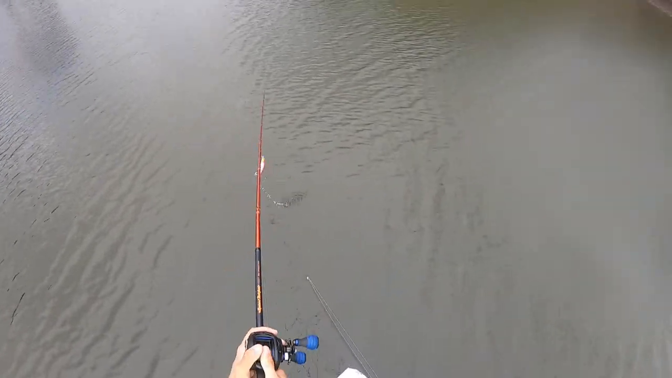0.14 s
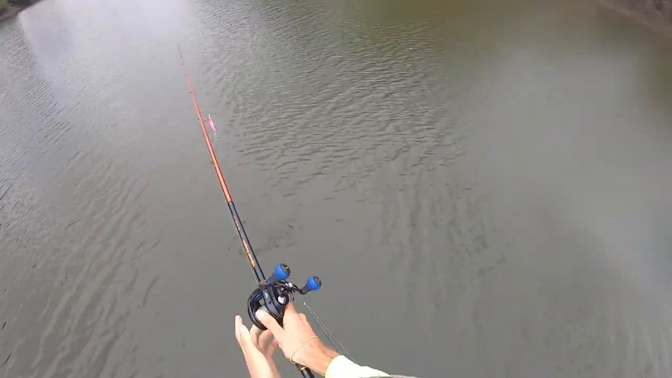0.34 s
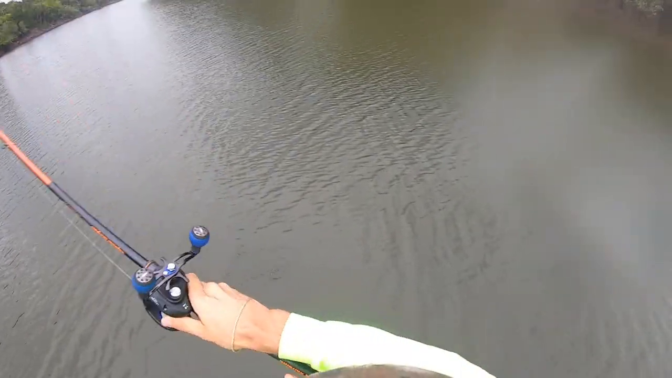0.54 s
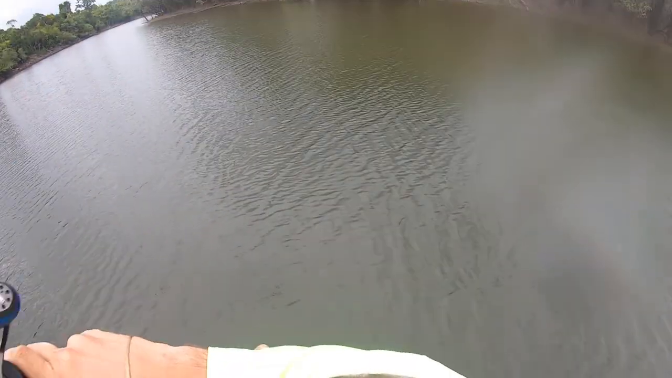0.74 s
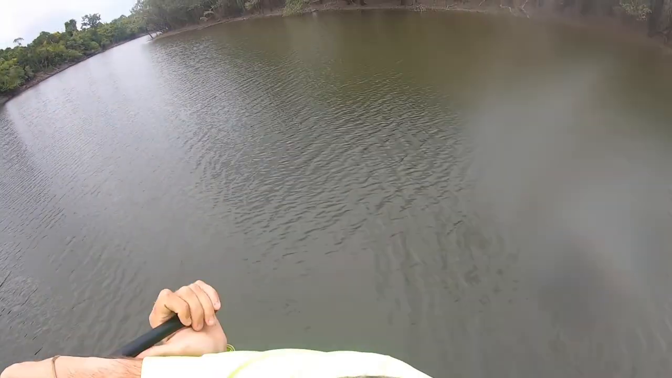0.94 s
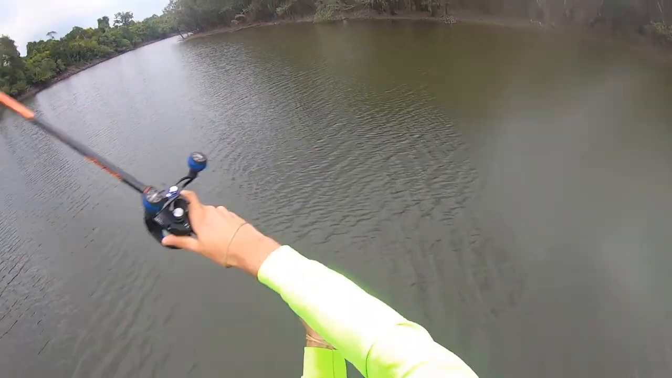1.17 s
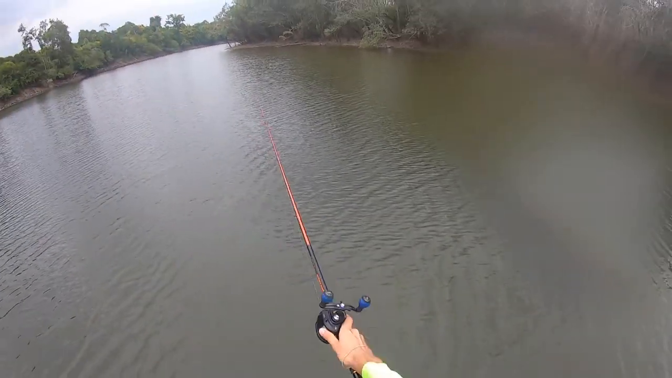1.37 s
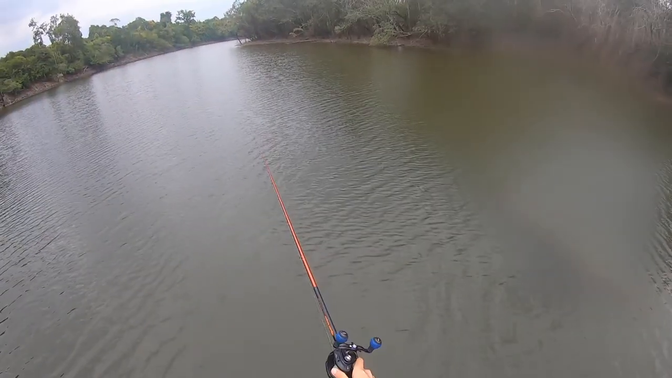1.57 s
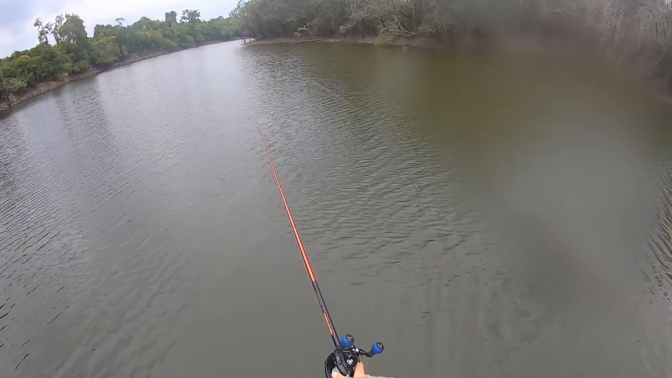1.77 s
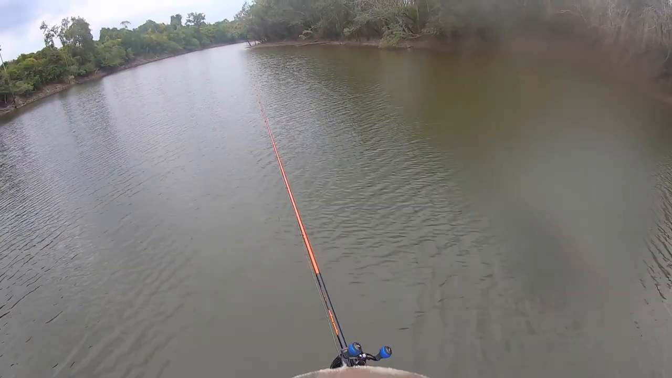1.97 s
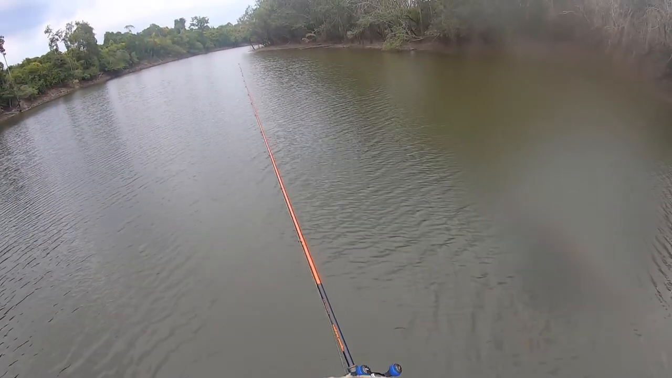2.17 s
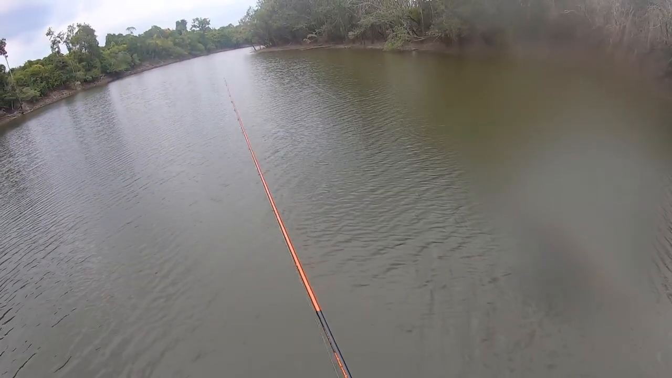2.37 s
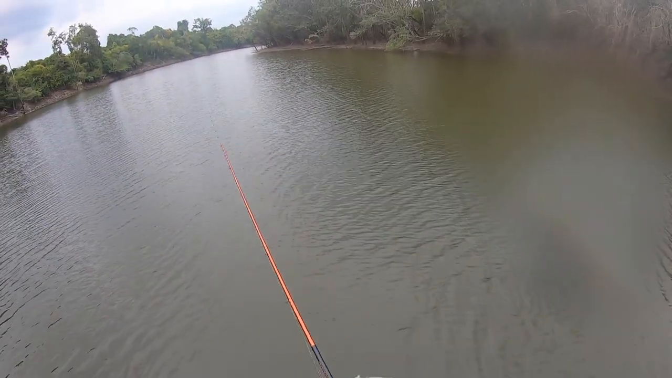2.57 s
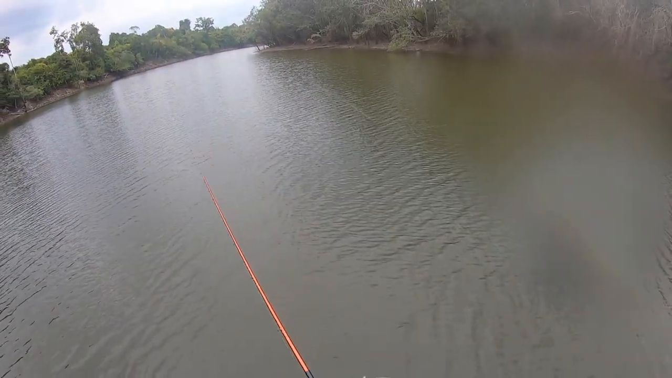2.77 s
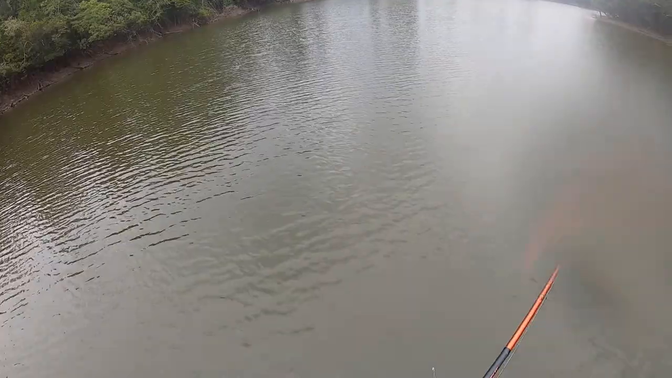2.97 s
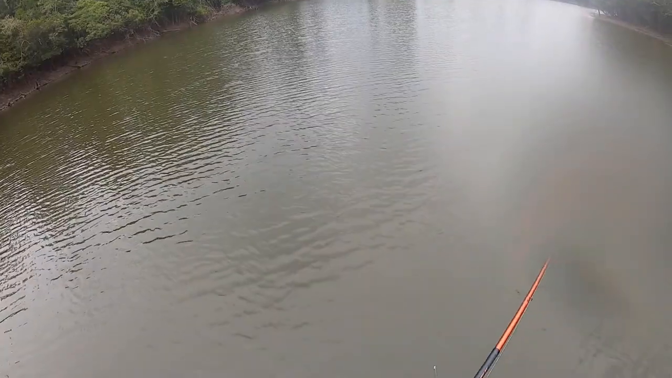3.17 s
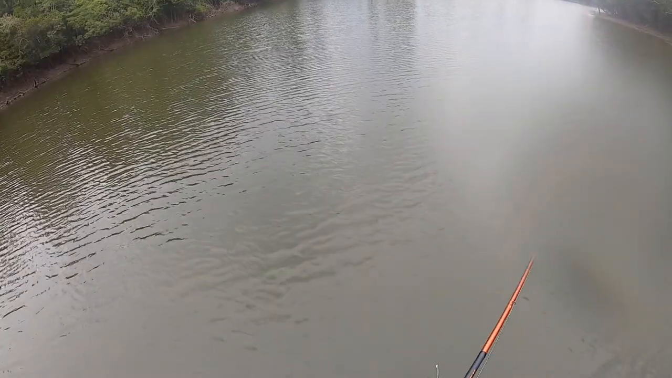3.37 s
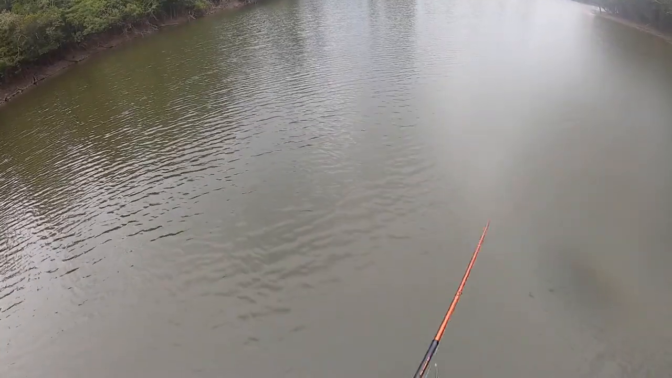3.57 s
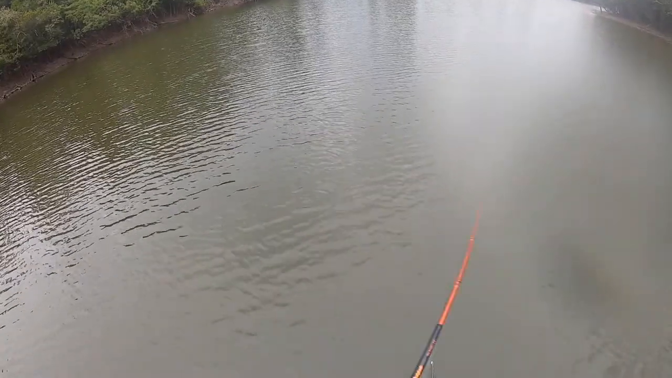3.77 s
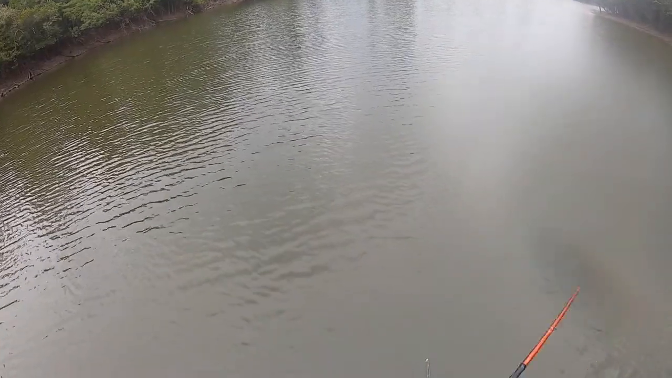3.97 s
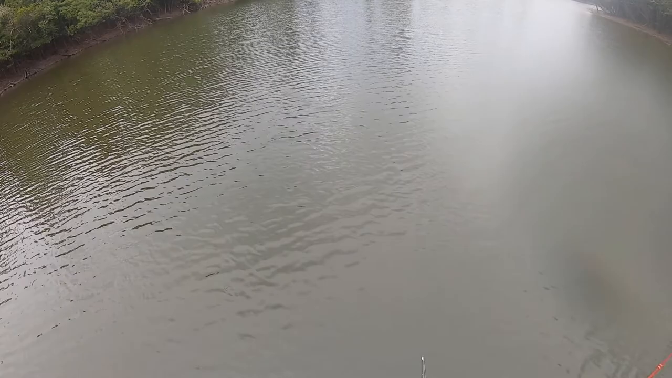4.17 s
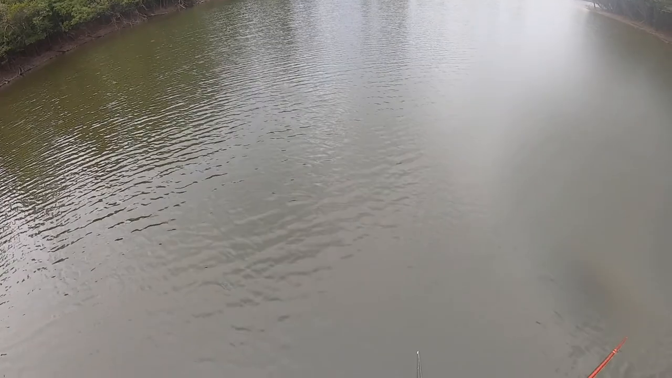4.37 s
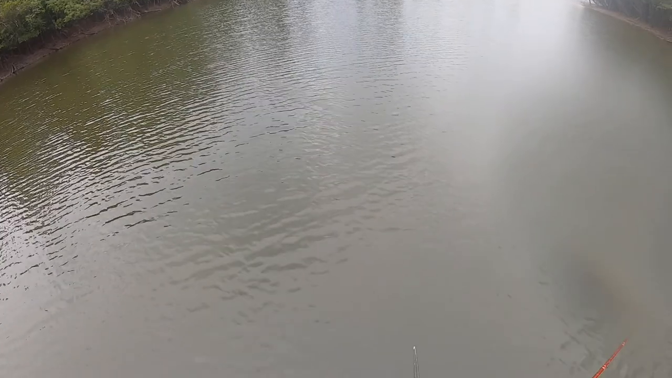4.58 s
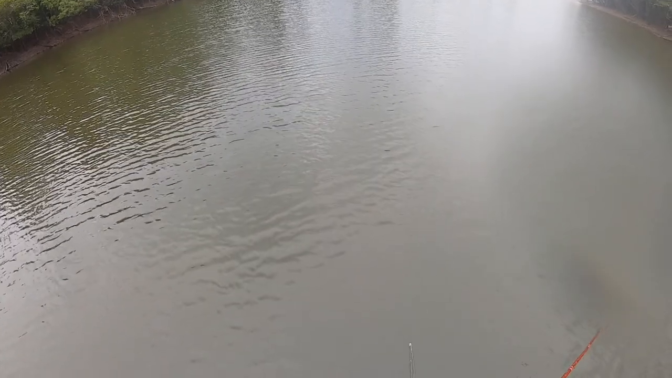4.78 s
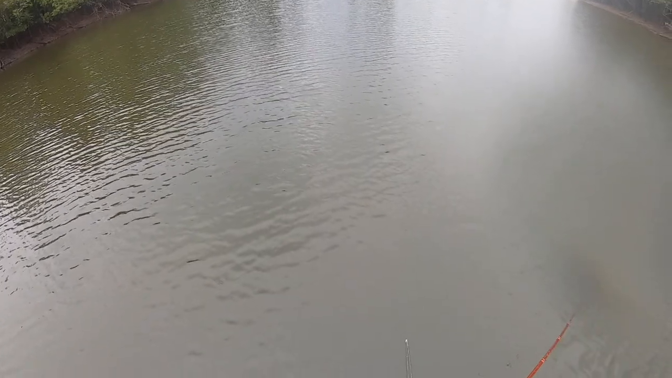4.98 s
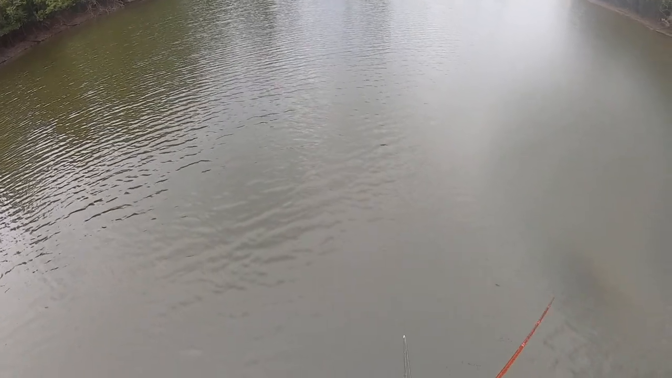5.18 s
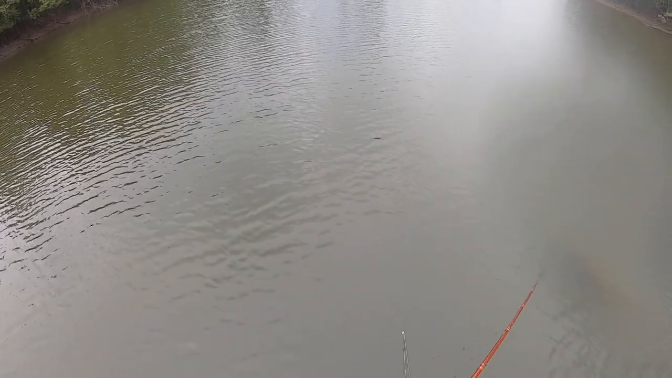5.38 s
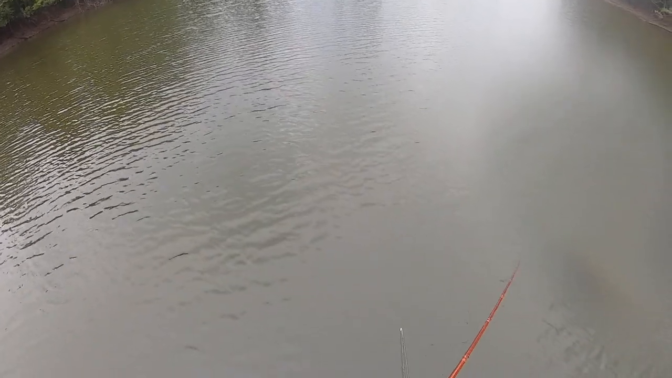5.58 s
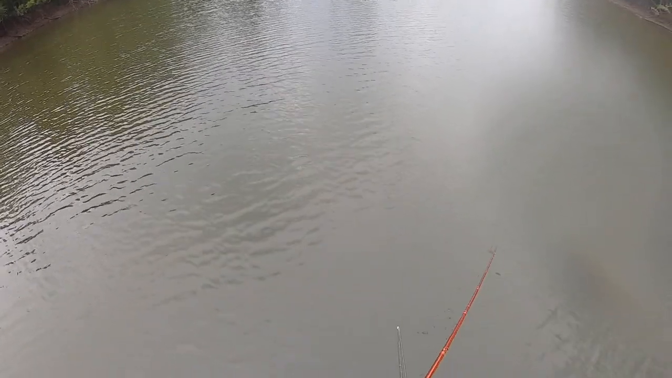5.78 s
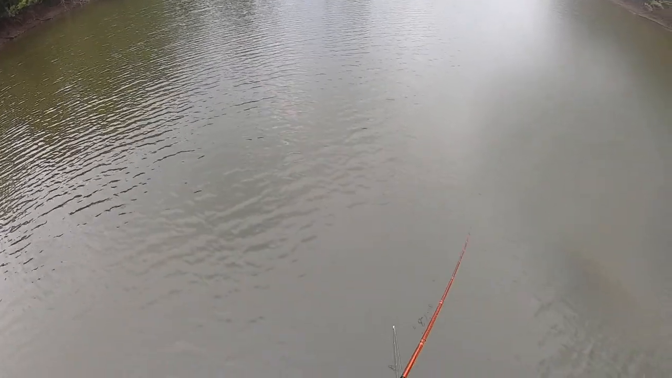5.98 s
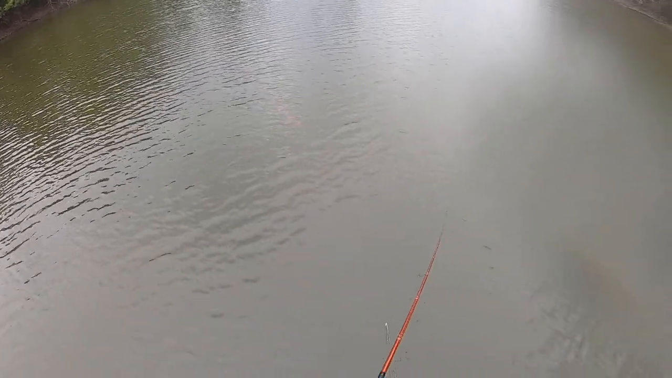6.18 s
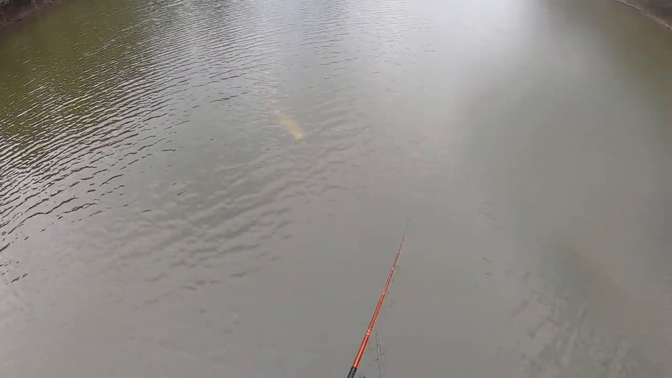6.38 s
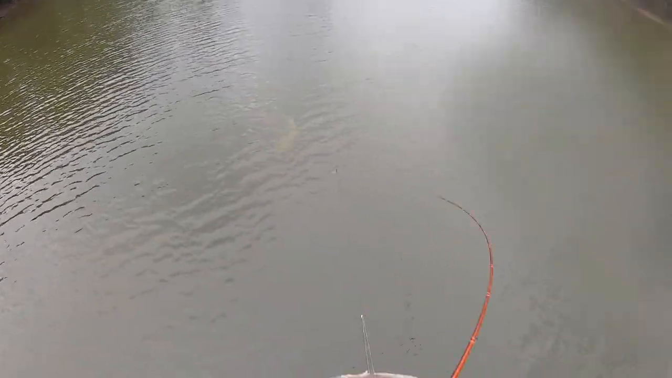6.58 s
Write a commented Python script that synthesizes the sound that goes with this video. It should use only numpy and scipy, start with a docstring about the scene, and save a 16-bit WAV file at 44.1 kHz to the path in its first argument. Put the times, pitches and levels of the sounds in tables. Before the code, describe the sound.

A fishing rod swishes, its reel spool whirring and slowing to a soft plop, then gritty cranking and sharp rod clicks on a calm river.

```python
"""A cast and retrieve with a baitcasting reel, heard dry from a body-worn camera on a calm river.
Sleeves rub and the thumb bar clicks; the rod swishes; the spool whirrs, its pulsed line hiss and ticks slowing.
A soft filtered-noise plop marks the lure; two spells of cranking follow, made of gear partials, noise and grit.
Between and after the spells, rod twitches snap the line taut: noise bursts, rod resonances and squeaky glides.
Faint water noise lasts throughout; light wind buffets the ports, strongest at the end."""
import sys
import numpy as np
from scipy import signal
from scipy.fft import rfft, irfft, next_fast_len
from scipy.io import wavfile
from scipy.ndimage import map_coordinates

SR = 44100
rng = np.random.default_rng(int(sys.argv[2]) if len(sys.argv) > 2 else 0)


def wav_out(sig):
    """Save sig, one row per channel (or a flat mono array), as 16-bit PCM at SR to the path in sys.argv[1]."""
    wavfile.write(sys.argv[1], SR, np.round(np.clip(np.atleast_2d(sig).T, -1, 1) * 32767).astype(np.int16))


N = 292471
TIME = np.arange(N) / SR


def amp(db):
    """Decibels to gain."""
    return 10 ** (np.asarray(db) / 20)


def unit(x):
    """Scale to rms 1."""
    return x / np.sqrt(np.mean(x ** 2) + 1e-20)


def along(points, hz, axis=1):
    """One column of a frequency table, on a log axis."""
    table = np.transpose(points)
    return np.interp(np.log(hz + 1), np.log(table[0] + 1), table[axis])


def curve(rows, axis=1):
    """One column of a time table, per sample."""
    table = np.transpose(rows)
    return np.interp(TIME, table[0], table[axis])


def level(rows, axis=1):
    """Gain from a dB column, fading 600 dB per s outside its span."""
    outside_s = np.maximum(rows[0][0] - TIME, 0) + np.maximum(TIME - rows[-1][0], 0)
    return amp(curve(rows, axis=axis) - 600 * outside_s)


def swell(s, half_s):
    """A smooth bump around time s."""
    return np.exp(-((TIME - s) / half_s) ** 2)


def burst(s, rise_s, t60_s):
    """An envelope that swells up to time s, then dies away."""
    rise = (np.minimum(TIME - s, 0) / rise_s) ** 2
    decay = np.log(1000) * np.maximum(TIME - s, 0) / t60_s
    return np.exp(-rise - decay)


def wobble(rate):
    """A smooth random curve, rate knots a second."""
    knots = rng.standard_normal(int(N * rate / SR) + 4)
    coarse_s = TIME[::8]
    return np.interp(TIME, coarse_s, map_coordinates(knots, [coarse_s * rate]))


def filtered(x, response):
    """x times a response of frequency."""
    m = next_fast_len(N + SR // 4)
    return irfft(rfft(x, m) * response(np.fft.rfftfreq(m, 1 / SR)), m)[..., :N]


def resonances(modes, f):
    """Causal response of a few damped modes, struck by a contact of finite length."""
    contact = signal.freqs(*signal.butter(6, 1, analog=True), f / 9300)[1]
    total = 0
    for k, (centre_hz, width_hz, db) in enumerate(modes):
        damping = 1j * f * width_hz
        total = total + (-1) ** k * amp(db) * damping / (centre_hz ** 2 - f ** 2 + damping)
    return contact * total


def panned(left_minus_right_db):
    """Left and right gains for a level difference."""
    return amp(np.array([[.5], [-.5]]) * left_minus_right_db)


# stereo images: freq_hz, left_right_likeness (-1 to 1), left_minus_right_db
AHEAD = [(202, 0.97, -1), (600, 0.58, -1.5), (1080, 0.13, -2), (2330, 0.64, 0), (4000, 1, 0),
         (7360, 0.31, 7), (9300, 0.032, -12.5)]
ASIDE = [(507, -0.22, -0.5), (1180, 0.26, -7), (2290, 0.57, -2.5), (3300, 1, -3), (5800, 0.065, 5),
         (6640, 0.21, 12), (9060, -0.51, -10)]
AROUND = [(60, 0.079, -0.37), (200, 0.067, -0.6), (1000, 0.014, -1.3), (6000, 0.21, 0.89)]


def placed(x, image):
    """Give x the left-right balance of an image."""
    return filtered(x, lambda hz: panned(along(image, hz, axis=2)))


def rush(colour, image):
    """Stereo noise of rms 1; colour is a spectrum or a response, the image sets channel likeness."""
    def response(hz):
        gain = colour(hz) if callable(colour) else amp(along(colour, hz))
        turn = np.arccos(np.clip(along(image, hz), -1, 1)) / 2
        return gain * np.array([np.cos(turn), np.sin(turn)])
    mid, side = filtered(rng.standard_normal((2, N)), response)
    return unit(placed(np.array([mid + side, mid - side]), image))


def partials(speed_hz, lines, flicker_db, fray_db, blur, blur_rate):
    """Multiples of a turning speed, unsteady in level and phase; the higher, the more broken."""
    phase = 2 * np.pi * np.cumsum(speed_hz) / SR
    total = np.zeros(N)
    for k, db in lines:
        gain = amp(db + (flicker_db + fray_db * k) * wobble(45))
        total += gain * np.sin(k * phase + blur * np.sqrt(k) * wobble(blur_rate))
    return unit(total)


# braked free spool, jerked faster by the flying lure: time_s, speed_turns_per_s
SPEED = [(1.42, 313), (1.53, 297), (1.62, 278), (1.75, 256), (1.882, 236), (1.902, 242), (1.984, 216),
         (2.002, 232), (2.084, 205), (2.1, 214), (2.185, 189), (2.243, 198), (2.32, 174), (2.39, 173),
         (2.49, 160), (3.1, 111)]
# line running out: time_s, hiss_db
PAYOUT = [(1.24, -66.5), (1.335, -40), (1.39, -42), (1.445, -44), (1.54, -48), (1.74, -52.5), (2.0, -51),
          (2.25, -50.5), (2.55, -53.5), (2.79, -57.5), (2.88, -55)]
# slack line flutter: time_s, level_over_hiss_db
FLUTTERING = [(1.24, -14), (1.9, -8), (1.97, -7.5), (2.08, -17.5), (2.25, -11), (2.5, -10), (2.88, -11.5)]
# noise spectra: freq_hz, density_db_per_hz
LINE = [(710, -64), (1200, 1), (1400, 0), (1840, -4.5), (1990, -1), (2860, -0.5), (3310, -2.5),
        (3590, -1.5), (5160, -1.5), (6580, 1.5), (8110, -9.5), (9210, -10.5), (10400, -26.5), (13600, -98),
        (22000, -120)]
FLUTTER = [(200, -10), (350, 6.5), (600, 4.5), (850, 10), (1300, 0.5), (2000, -25.5)]
# spool tones: time_s, level_over_hiss_db
WHIRR = [(1.42, -9.5), (1.55, -8.5), (1.85, -3.5), (2, -10.5), (2.3, -18), (2.6, -12)]
# spool overtones: multiple_of_turn, relative_level_db
SPOOL_LINES = [(2, 10), (3, 10), (4, 9.5), (5, 9.5), (6, 5.5), (7, 3), (8, -4), (9, 1), (10, -9)]
WHIP_S = 1.34  # the rod whips forward


def spool():
    """The spool sheds line in pulses once a turn, while its rotation sounds as tones and ticks."""
    speed = curve(SPEED)
    turns = np.cumsum(speed) / SR
    hiss = level(PAYOUT)
    whip_flap = amp(-47.5) * burst(WHIP_S, rise_s=0.015, t60_s=0.17)
    flutter = level(FLUTTERING) * hiss + whip_flap
    shedding = unit(amp(0.61 * np.cos(2 * np.pi * turns) + 1.43 * wobble(300)))
    line = shedding * (hiss * rush(LINE, AHEAD) + flutter * rush(FLUTTER, AHEAD))
    tones = partials(speed, SPOOL_LINES, flicker_db=4, fray_db=.2, blur=.25, blur_rate=60)
    whine = level(WHIRR) * hiss * tones
    turning = rod_hum(speed, turns) + whine + singing(speed, shedding) + ticks(turns)
    return line + placed(turning, AHEAD)


# rod resonances excited by the spool: centre_hz, width_hz, level_db
SHAKE = [(289, 7.7, -59.5), (265.3, 21, -53), (193, 6, -52.5)]


def rod_hum(speed, turns):
    """The rod hums when the spool's turning rate passes one of its resonances."""
    stop_s, fade_s = 3.1, .022  # the handle engages and stops the spool
    fade_in = np.clip((TIME - WHIP_S) / fade_s, 0, 1)
    fade_out = np.clip((stop_s - TIME) / fade_s, 0, 1)
    power = sum(amp(db) ** 2 / (1 + (2 * (speed - hz) / width_hz) ** 2) for hz, width_hz, db in SHAKE)
    tone = np.sqrt(2) * np.sin(2 * np.pi * turns + 0.35 * wobble(50))
    return fade_in * fade_out * np.sqrt(power) * tone


# singing band of the running line: time_s, centre_hz, level_db
SINGING = [(1.44, 2900, -50), (1.55, 2700, -60.5), (1.64, 2500, -59.5), (1.72, 2450, -58),
           (1.82, 2700, -56.5), (1.92, 2700, -59), (1.98, 2600, -61), (2.07, 2050, -62), (2.14, 1700, -67),
           (2.2, 1200, -60.5), (2.27, 1150, -57.5), (2.33, 1450, -66), (2.42, 1500, -61.5),
           (2.55, 1350, -76)]


def singing(speed, shedding):
    """Spool overtones swell in the band where the line sings; narrow noise follows the band."""
    spread, half_width_hz, noise_db = .18, 380, -2  # spread as a fraction of the centre
    centre = curve(SINGING)
    phase = 2 * np.pi * np.cumsum(speed) / SR
    tones = np.zeros(N)
    for k in range(5, 18):
        gain = 1 / (1 + ((k * speed - centre) / (spread * centre)) ** 2)
        tones += gain * amp(4 * wobble(30)) * np.sin(k * phase + .8 * wobble(60))
    baseband = wobble(2 * half_width_hz) + 1j * wobble(2 * half_width_hz)
    band = baseband * np.exp(2j * np.pi * np.cumsum(centre) / SR)
    return level(SINGING, axis=2) * (tones + amp(noise_db) * shedding * unit(band.real))


# rub once a turn, before frame gain: time_s, strength_db
RUB = [(1.4, -40), (1.7, -43.5), (1.86, -41.5), (1.96, -33.5), (2.25, -38), (2.33, -45.5), (2.53, -43),
       (2.6, -68)]
# loose loop slapping the frame until tugged straight, before frame gain:
# peak_s, strength_db, rise_s, t60_s
SLAPS = [(1.888, -27, .002, 0.056), (1.994, -32.5, 0.023, .09), (2.09, -43, 0.045, 0.096),
         (2.165, -44, 0.011, .15), (2.258, -36, 0.037, 0.11)]
# reel frame modes: centre_hz, width_hz, relative_level_db
FRAME = [(3090, 2020, -1), (4200, 2400, -1.5), (6600, 2600, -8.5), (8660, 1800, -13)]


def ticks(turns):
    """Contacts once a turn strike the damped modes of the frame."""
    scatter_db, jitter_s, frame_gain_db = 1.8, .00002, 19.5
    positions = np.arange(N) + jitter_s * SR * wobble(400)
    at = np.interp(np.arange(1, int(turns[-1])), turns, positions)
    contact = level(RUB) + sum(amp(db) * burst(s, rise_s, t60_s) for s, db, rise_s, t60_s in SLAPS)
    size = contact[at.astype(int)] * amp(scatter_db * rng.standard_normal(len(at)))
    # sinc pulses land between samples
    taps = at.astype(int)[:, None] + np.arange(-8, 9)
    weights = size[:, None] * np.sinc(taps - at[:, None])
    pulses = np.bincount(np.clip(taps, 0, N - 1).ravel(), weights.ravel(), N)
    return amp(frame_gain_db) * filtered(pulses, lambda f: resonances(FRAME, f))


# pushes on the handle: peak_s, top_mesh_hz, half_length_s, extra_whine_db
PUSHES = [(2.902, 614, 0.066, 1.5), (3.059, 758, 0.095, 2.5), (3.176, 640, 0.041, 0.5),
          (3.299, 739, 0.041, 1.5), (3.37, 723.5, 0.049, 1), (3.454, 635, 0.062, 0),
          (3.557, 649, 0.036, 5.5), (4.613, 925, 0.075, -2.5), (4.73, 781.6, 0.04, 0.5),
          (4.812, 816.4, 0.065, 0), (4.968, 861, 0.062, -0.5), (5.086, 771, 0.062, -3.5),
          (5.228, 748, 0.06, -1.5), (5.355, 693, 0.06, 1), (5.507, 660.4, 0.048, -2),
          (5.581, 627.7, 0.05, -0.5), (5.645, 684.4, 0.047, 0.5), (5.778, 742.6, 0.045, 0),
          (5.861, 653, 0.068, -0.5), (5.955, 729.4, 0.045, 1.5), (6.06, 743, 0.055, 1),
          (6.136, 613.5, 0.046, -0.5), (6.212, 680, 0.075, 5), (6.358, 743, 0.066, 0.5),
          (6.47, 655, 0.05, -2)]
# cranking, levels at the usual pace: start_s, stop_s, level_db, run_down_t60_s
SPELLS = [(2.925, 3.54, -55.5, 1), (4.618, 6.495, -58, 0.17)]
# gear tones: multiple_of_mesh, relative_level_db
GEAR_LINES = [(.51, 0), (1.02, 3), (1.54, -3), (2.02, -7.5), (2.6, -14), (3.02, -12.5), (3.45, -17),
              (3.76, -10.5), (3.99, -5.5), (4.55, -17), (4.95, -12.5), (5.62, -14), (5.98, -9.5),
              (6.6, -14), (7.02, -11), (7.72, -6.5), (7.99, -1.5), (9, -15)]
# reel case colour: freq_hz, gain_db
CASE = [(400, -16), (750, -5), (950, -5), (1250, 6.5), (1700, -0.5), (2450, 5.5), (2950, 7), (3500, 4),
        (4600, 0.5), (5700, -1.5), (6400, -5), (7500, -8.5)]
# sliding noise, one spectrum per spell: freq_hz, density_db_per_hz
GEARS = [
    [(210, -49), (350, -13), (478, -20), (743, -1), (821, 2), (1120, -2.5), (1650, -7.5), (2910, -2),
     (3450, -11), (5750, -2.5), (8940, -13), (10400, -32), (13600, -101), (22000, -120)],
    [(210, -35), (350, -18), (499, -16.5), (683, -5.5), (920, -6.5), (1290, -3.5), (1650, -8), (1790, -4),
     (2250, -7.5), (2990, -5.5), (3400, -7), (4850, -11.5), (5510, -10.5), (8940, -24.5), (10400, -46),
     (13600, -99), (22000, -120)],
]


def retrieve():
    """Loaded gears sing through the case over grainy sliding of teeth and wet line; faster is louder."""
    slack_hz, usual_hz, louder_db_per_octave, spin_up_s = 520, 704, 4, 0.073
    whine_db, grit_db, load_power = -2, -12, 0.25
    push_power = sum(((hz - slack_hz) * swell(s, half_s)) ** 2 for s, hz, half_s, _ in PUSHES)
    pace = slack_hz + np.sqrt(push_power)
    extra_db = sum(db * swell(s, half_s) for s, _, half_s, db in PUSHES)
    load = ((pace - slack_hz) / (usual_hz - slack_hz)) ** load_power * amp(extra_db)
    judder = 1 + .0125 * wobble(260)
    mesh = partials(pace * judder, GEAR_LINES, flicker_db=2.2, fray_db=.35, blur=.3, blur_rate=190)
    cased = unit(filtered(mesh, lambda hz: amp(along(CASE, hz))))
    whine = amp(whine_db) * load * placed(cased, ASIDE)
    grain = unit(amp(1.75 * wobble(400) + 1.1 * wobble(50)))
    out = np.zeros((2, N))
    for (start_s, stop_s, db, t60_s), colour in zip(SPELLS, GEARS):
        spin_up = swell(start_s, spin_up_s) ** (TIME < start_s)
        run_down = amp(-60 * np.maximum(TIME - stop_s, 0) / t60_s)
        sliding = grain * rush(colour, ASIDE)
        out += amp(db) * spin_up * run_down * (whine + amp(grit_db) * grit() + sliding)
    return amp(louder_db_per_octave * np.log2(pace / usual_hz)) * out


# rod modes: centre_hz, width_hz, relative_level_db
ROD = [(298, 630, -19), (1071, 60, 3), (1240, 240, -3), (1390, 110, 1.5), (1700, 200, -6.5),
       (1986, 100, 1.5), (2420, 70, -1.5), (2980, 130, -9), (3690, 260, -14), (4888, 350, -22)]


def rod_response(f):
    """Damped modes of the rod."""
    return resonances(ROD, f)


def grit():
    """Loose parts chatter: many tiny random knocks on the rod, rms 1 before placing."""
    hits_per_s, scatter_db = 120, 7
    hits = (rng.random(N) < hits_per_s / SR) * amp(scatter_db * rng.standard_normal(N))
    return placed(unit(filtered(hits, rod_response)), ASIDE)


def slips():
    """Stick-slip graininess, rms 1."""
    return unit(amp(2.6 * wobble(700)))


# thumb bar, handle play, line on guides: start_s, blow_db, knock_over_blow_db, t60_s
CLICKS = [(0.1232, -69, -4, .028), (0.154, -49.5, -10, 0.021), (0.2846, -42.5, -18, 0.011),
          (0.3171, -38, -18, 0.033), (0.3707, -49, -3.5, 0.032), (0.4388, -48.5, -16, 0.034),
          (0.463, -46, -27, 0.0076), (0.545, -42.5, -32, 0.0092), (.64, -51.5, -28, 0.058),
          (0.6999, -46.5, -20, 0.019), (0.9523, -55, -14, 0.013), (1.042, -50, -31, 0.026),
          (1.092, -52.5, -40, .012), (1.144, -51, -30, 0.064), (1.258, -60, 6, .03),
          (3.865, -57.5, -5, 0.023), (3.902, -51.5, -14, 0.023), (3.973, -30, -15, .012),
          (3.9767, -39, -10, 0.014), (4.01, -55, 2, .015), (4.0325, -48.5, -15, 0.029),
          (4.047, -51, -10, .01), (4.062, -56, -22, 0.0092), (4.183, -37, -17, 0.017),
          (4.224, -39, -18, 0.018), (4.2615, -50, -19, 0.0081), (4.384, -51.5, 0, 0.018),
          (6.6055, -28, -6.5, 0.007)]
# click spectra: freq_hz, density_db_per_hz
SNAP = [(1500, -19), (3000, 4.5), (5000, 7.5), (6700, 11), (8200, -5), (10000, -32), (11500, -66),
        (15000, -34)]
TINK = [(3500, -56), (6500, 6.5), (9300, 0.5), (11500, -16), (14500, -20), (17000, -39)]


def clicks():
    """Contacts give a bright snap and a rod knock; those with little knock sound thinner."""
    tink_db, light_knock_db = -3.5, -27
    snap, tink, knock = np.zeros(N), np.zeros(N), np.zeros(N)
    for s, db, knock_db, t60_s in CLICKS:
        blow = amp(db) * burst(s + .001, rise_s=.0005, t60_s=t60_s)
        light = 1 / (1 + amp(knock_db - light_knock_db))
        snap += (1 - light) * blow
        tink += amp(tink_db) * light * blow
        knock += amp(knock_db) * blow
    rod = slips() * knock * rush(rod_response, ASIDE)
    return snap * rush(SNAP, AHEAD) + tink * rush(TINK, AHEAD) + rod


# taut line through the guides: peak_s, rise_s, t60_s, hiss_db, rod_knock_db, left_minus_right_db
RASPS = [(1.331, 0.0077, 0.15, -40, -72, 16.5), (1.39, 0.018, 0.19, -31.5, -41.5, 4),
         (3.89, 0.012, 0.31, -75, -73, -7), (3.945, 0.016, 0.047, -56.5, -85, 3),
         (3.962, 0.011, 0.31, -45, -49, 1.5), (3.989, 0.0016, 0.015, -41.5, -54, 10),
         (4.181, 0.002, 0.19, -42, -39.5, -5.5), (6.6, 0.0022, 0.11, -48.5, -46.5, 3)]
# guide scrape: freq_hz, density_db_per_hz
GUIDES = [(880, -15), (1500, 1.5), (2460, -1), (2740, 9), (3350, 3.5), (3640, 4.5), (5070, 0.5),
          (6320, 5.5), (8190, -8), (9030, -9.5), (10400, -17.5), (13600, -79), (22000, -120)]


def rasps():
    """Stick-slip of taut line scrapes the guides and excites the rod."""
    hiss, knock = np.zeros((2, N)), np.zeros((2, N))
    for s, rise_s, t60_s, hiss_db, knock_db, pan_db in RASPS:
        stroke = burst(s, rise_s, t60_s) * panned(pan_db)
        hiss += amp(hiss_db) * stroke
        knock += amp(knock_db) * stroke
    return slips() * (hiss * rush(GUIDES, AHEAD) + knock * rush(rod_response, ASIDE))


# play in handle and reel seat: start_s, peak_db, brightness_db_per_octave, chatter_t60_s
KNOCKS = [(0.3155, -44, -8, 0.066), (.3205, -41, 8, 0.015), (3.057, -45, -4, 0.093),
          (3.143, -46.5, -5, 0.083), (3.566, -47, -3, 0.13), (3.949, -43, -29, 0.042),
          (3.958, -38.5, -25, 0.051), (3.965, -37.5, -28, 0.02), (3.9898, -36.5, 12, 0.008),
          (3.9925, -41, -12, 0.013), (4.018, -44, -2, 0.24), (4.05, -45.5, -13, 0.072),
          (4.1821, -27.5, 3, 0.0066), (4.189, -30.5, -1.5, 0.042), (4.1961, -33.5, -3.5, 0.026),
          (4.201, -31.5, -4.5, .02), (4.2107, -39, -6, 0.012), (4.227, -47, -11, 0.018),
          (4.241, -48.5, -17, 0.14), (4.676, -40, 7, 0.048), (4.702, -47, 10, 0.034),
          (4.864, -39.5, 11, 0.017), (4.886, -41.5, 6, 0.037), (4.925, -48.5, 8, 0.035),
          (5.155, -47.5, -6, 0.056), (5.349, -47.5, -10, 0.049), (6.42, -46.5, 7, .04)]


def knocks(size=8192):
    """Each blow and its chatter ring the rod; hard contacts favour the high modes."""
    chatter_energy_db = 5  # over the first blow
    out = np.zeros(N + size)
    t, hz = np.arange(size) / SR, np.fft.rfftfreq(size, 1 / SR)
    body = rod_response(hz)
    octaves = np.log2(np.clip(hz, 1000, 4500))
    for s, db, bright_db, t60_s in KNOCKS:
        chatter = rng.standard_normal(size) * amp(-60 * t / t60_s)
        drive = (t == 0) + amp(chatter_energy_db) * chatter / np.linalg.norm(chatter)
        ring = irfft(rfft(drive) * body * amp(bright_db * octaves))
        out[round(s * SR):][:size] += amp(db) * ring / np.abs(ring).max()
    return placed(out[:N], ASIDE)


# wet line: start_s, length_s, start_hz, end_hz, level_db
SQUEAKS = [(0.072, 0.0082, 3640, 4430, -50), (0.072, 0.024, 2040, 3300, -55),
           (0.085, 0.045, 2500, 3300, -61), (0.125, 0.0099, 2900, 3300, -56),
           (0.147, 0.043, 2710, 4630, -60.5), (0.627, 0.16, 2860, 3710, -64),
           (1.324, 0.014, 5920, 6430, -37), (1.338, 0.041, 2664, 4430, -38.5),
           (3.871, 0.045, 1380, 1370, -59.5), (4.045, 0.017, 2650, 2840, -42.5),
           (4.054, 0.02, 2280, 2000, -51.5), (4.083, 0.084, 1414, 1350, -55.5),
           (4.254, 0.037, 2600, 2010, -45.5), (4.641, 0.033, 6100, 4820, -56.5)]


def squeaks():
    """Short scratchy glides as line tension changes; the faint ones are the roughest."""
    flutter_db = 2.5
    out, roughness = np.zeros(N), wobble(800)
    for s, length_s, start_hz, end_hz, db in SQUEAKS:
        u = np.clip((TIME - s) / length_s, 0, 1)
        phase = 2 * np.pi * np.cumsum(start_hz + (end_hz - start_hz) * u) / SR
        scratch = np.interp(db, [-57.5, -45], [1.7, .7])
        out += amp(db) * np.sin(np.pi * u) * np.sin(phase + scratch * roughness)
    return out * unit(amp(flutter_db * wobble(400))) * panned(-6.0)


# rod cutting the air: time_s, level_db
SWISH = [(1.2, -94), (1.28, -58), (1.33, -47), (1.39, -45.5), (1.44, -61), (1.5, -62)]
# swish spectrum: freq_hz, density_db_per_hz
AIR = [(50, -24), (105, -40), (170, 1), (280, 1.5), (500, -3.5), (1000, -7), (2500, -15), (9000, -70)]


def rod_swish():
    """Air noise swells and fades with the rod stroke."""
    return level(SWISH) * rush(AIR, AHEAD)


# lure landing: time_s, level_db
PLOP = [(2.5, -65), (2.56, -61.5), (2.66, -51), (2.75, -52), (2.8, -65), (2.88, -74)]
# water splash spectrum: freq_hz, density_db_per_hz
SPLASH = [(30, -58), (110, -31), (170, -3), (210, 6.5), (270, -11), (500, -12.5), (850, -11), (1050, -18),
          (1400, -12.5), (1900, -41), (9000, -71)]


def lure_plop():
    """The lure's landing is a short, unsteady burst of water noise."""
    return level(PLOP) * unit(amp(1.7 * wobble(70))) * rush(SPLASH, AHEAD)


# arms swinging back: time_s, level_db
SLEEVE_RUB = [(0, -35.5), (.045, -48), (.14, -59.5), (.24, -58.5), (.295, -60), (.325, -65), (.37, -53),
              (.405, -66), (.5, -61.5), (.54, -73), (.8, -77), (1.0, -101), (1.26, -78)]
# cloth rustle: time_s, level_db
SLEEVE_RUSTLE = [(0, -71.5), (.2, -62.5), (.38, -61.5), (.42, -66.5), (.72, -69.5), (.85, -66),
                 (1.08, -75.5), (1.26, -66)]
# cloth spectra: freq_hz, density_db_per_hz
RUBBING = [(40, -17), (100, -33), (150, 4.5), (270, 4.5), (420, -15), (900, -21), (2000, -36), (9000, -69)]
CLOTH = [(290, -51), (500, -24), (751, -3), (921, 2), (2710, -5), (3590, -2), (5330, -1), (6700, -1),
         (10400, -26), (13600, -39), (22000, -120)]


def sleeves():
    """Cloth friction: a low fluttering rub under a brighter rustle."""
    rub_flutter = unit(amp(2.5 * wobble(30.5)))
    rustle_flutter = unit(amp(2.4 * wobble(110.8)))
    rubbing = level(SLEEVE_RUB) * rub_flutter * rush(RUBBING, AROUND)
    return rubbing + level(SLEEVE_RUSTLE) * rustle_flutter * rush(CLOTH, AROUND)


# wind on the ports, before flutter: time_s, level_db
BREEZE = [(0, -54), (.4, -62.5), (.9, -83), (1.35, -61), (1.7, -74), (2.8, -73), (3.2, -80), (3.6, -58),
          (3.85, -43.5), (4.08, -50.5), (4.4, -65), (4.8, -71), (5.15, -74), (6.0, -79), (6.4, -50),
          (6.5, -35.5), (6.63, -27)]
# single puffs: peak_s, half_length_s, level_db
PUFFS = [(.01, 0.016, -46), (0.121, .005, -37.5), (0.151, 0.018, -42.5), (0.496, 0.024, -58),
         (2.312, 0.021, -48), (2.523, 0.011, -49.5), (2.948, 0.047, -46), (3.258, 0.088, -49),
         (3.71, 0.017, -38.5), (3.807, 0.007, -36), (4.01, 0.031, -45), (4.144, 0.014, -45),
         (4.216, 0.042, -41.5), (4.577, 0.06, -49.5), (4.717, 0.025, -58), (6.152, 0.02, -46.5)]
# slow and fast wind spectra: freq_hz, density_db_per_hz
DRIFT = [(10, 6.5), (35, 14.5), (52, -13.5), (80, -30), (200, -67), (1000, -110)]
BUFFET = [(15, -6.5), (45, -4.5), (75, -2), (105, -13), (150, -11.5), (230, -26.5), (400, -48.5),
          (1000, -61), (3000, -110)]
# port image: freq_hz, left_right_likeness, left_minus_right_db
PORTS = [(40, -0.16, -9.5), (150, 0.47, -6), (400, 0.26, -19)]


def wind():
    """Gusts and the body's turn push air over mostly the right port; strong gusts shed faster eddies."""
    puffs = sum(amp(db) * swell(s, half_s) for s, half_s, db in PUFFS)
    gust = level(BREEZE) * amp(1.2 * wobble(14)) + puffs
    eddies = gust / (gust + amp(-50))
    body_turn = amp(-50) * swell(1.33, half_s=.13)
    slow = (body_turn + gust * (1 - eddies)) * rush(DRIFT, PORTS)
    return slow + gust * eddies * rush(BUFFET, PORTS)


# ripples at the boat: peak_s, half_length_s, level_db
LAPS = [(4.419, 0.0085, -60), (5.428, 0.06, -64.5)]
# river spectrum: freq_hz, density_db_per_hz
RIVER = [(25, -3.5), (50, -12), (100, -16.5), (165, 6.5), (230, 0.5), (430, -13), (750, -4), (1050, -11),
         (2000, -9.5), (6000, -17.5), (8000, -25.5), (10400, -36), (13000, -98)]


def river():
    """Faint, slowly varying water noise with short laps at the boat."""
    water = amp(-65.5 + 0.28 * wobble(4.5)) * rush(RIVER, AROUND)
    laps = sum(amp(db) * swell(s, half_s) for s, half_s, db in LAPS)
    return water + laps * rush(SPLASH, AHEAD)


def scene():
    """Sum of all sources, dry over open water."""
    reel = spool() + retrieve()
    tackle = clicks() + rasps() + knocks() + squeaks()
    casting = rod_swish() + lure_plop() + sleeves()
    return reel + tackle + casting + wind() + river()


def record(dry):
    """The camera keeps nothing from its band limit up."""
    top_hz = 15500
    return filtered(dry, lambda hz: hz < top_hz)


dry = scene()
out = record(dry)
wav_out(out)
```